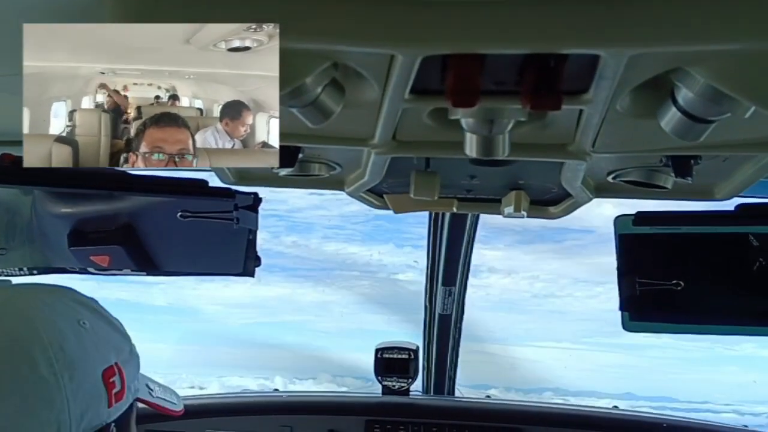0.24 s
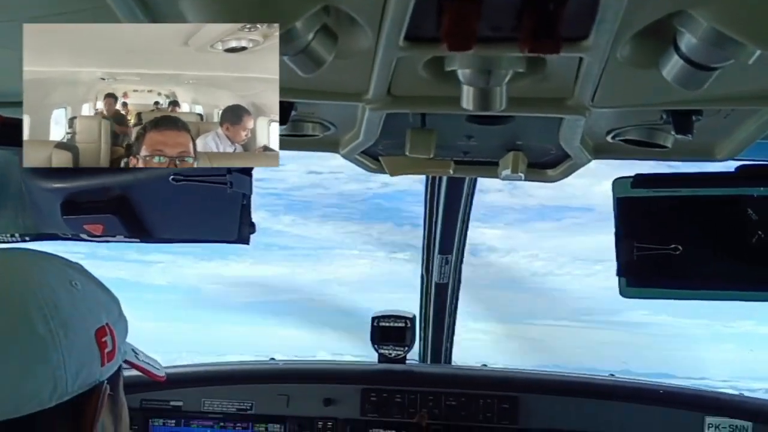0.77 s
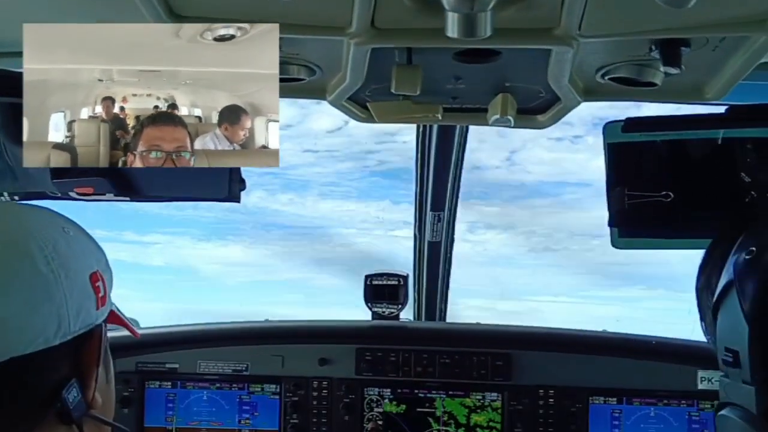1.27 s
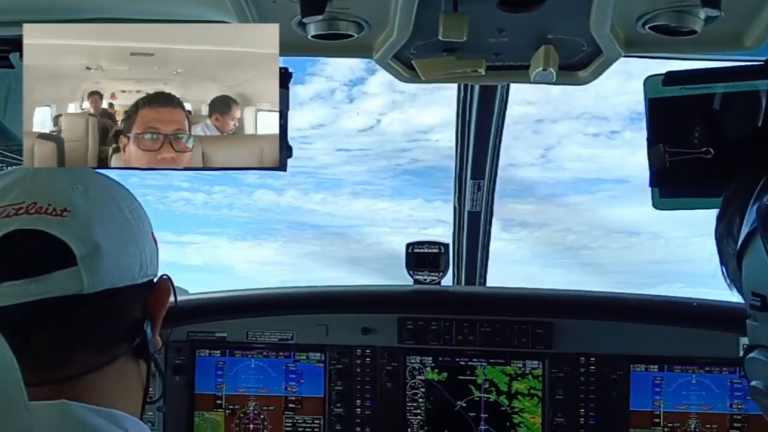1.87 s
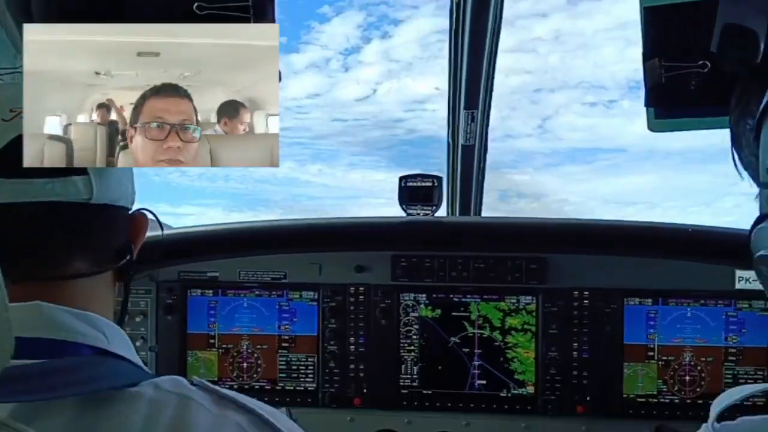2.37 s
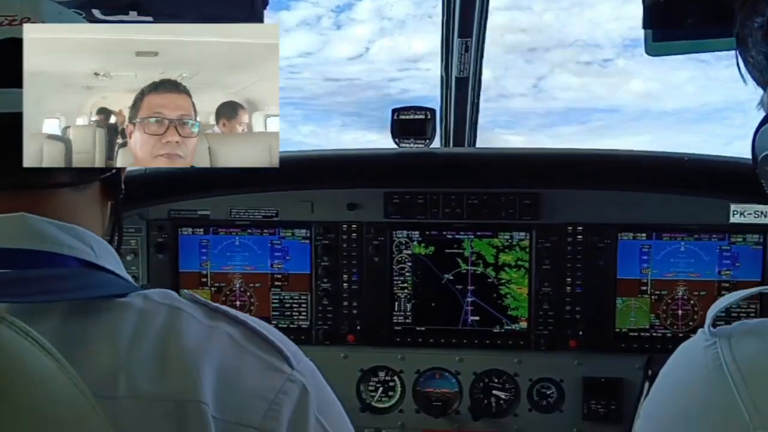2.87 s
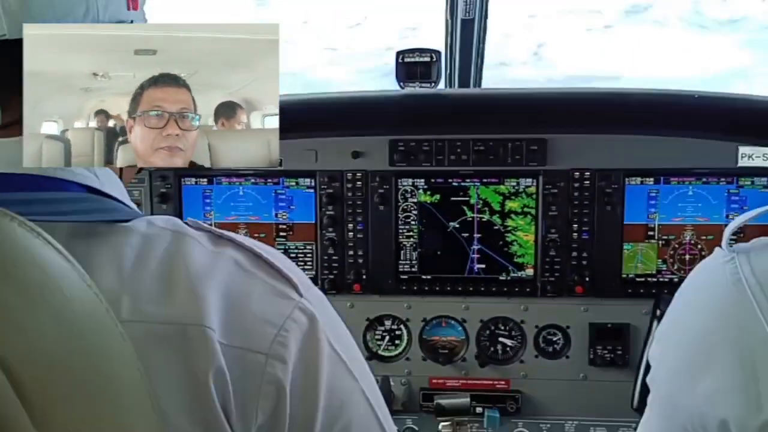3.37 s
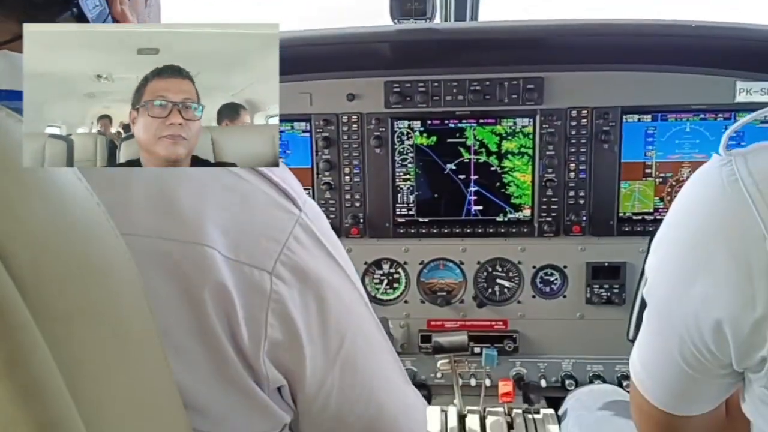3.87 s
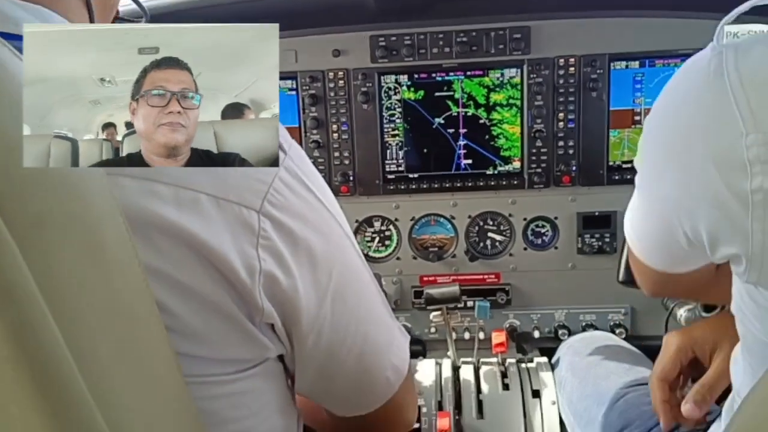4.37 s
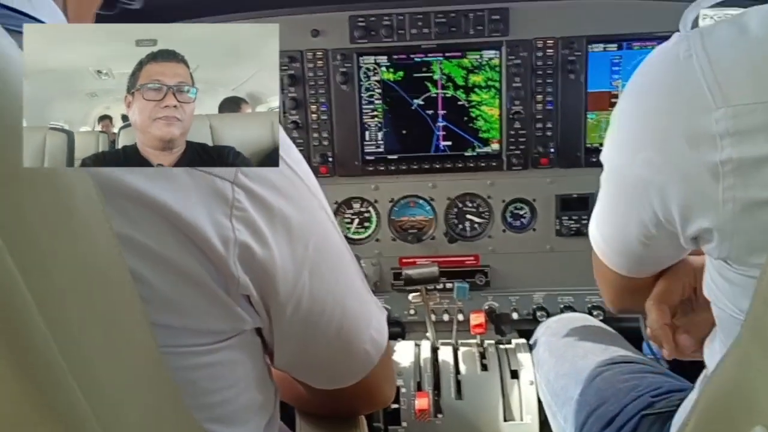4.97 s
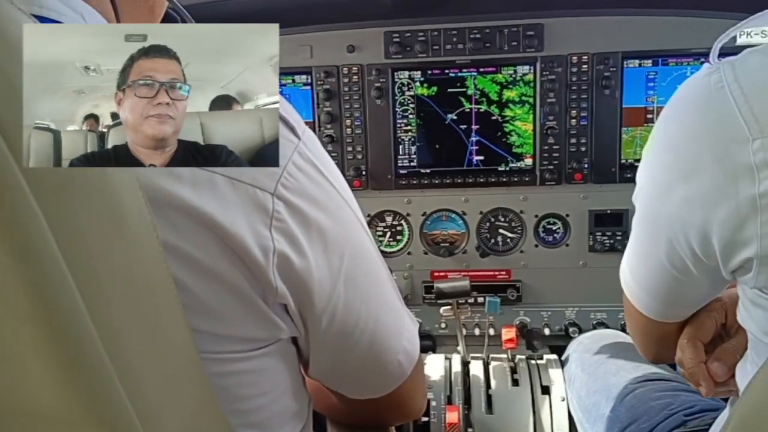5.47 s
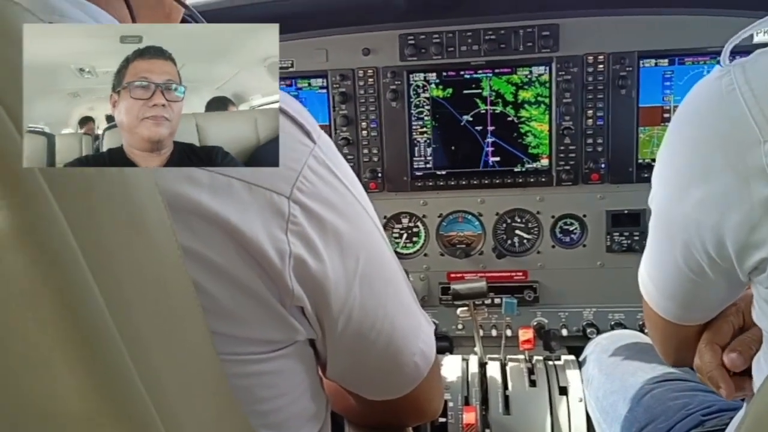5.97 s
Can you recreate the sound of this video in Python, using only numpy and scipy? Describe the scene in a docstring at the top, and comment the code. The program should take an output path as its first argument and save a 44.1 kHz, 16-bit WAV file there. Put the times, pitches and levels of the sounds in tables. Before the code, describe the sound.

Close, enclosed cockpit of a single turboprop in level cruise, caught by a handheld microphone behind the pilots. Deep, throbbing blade hum dominates, with faint steady machinery tones, muffled airflow rumble and midrange roar. Fine vent hiss, squeezed by automatic level control, trembles on each pulse. The tone colour changes subtly during a tilt downward, then a faint, very high whine rises and eases back.

```python
"""Inside the cabin of a single turboprop in level cruise, for about 6.2 s. From the start a four-blade propeller
drones as a harmonic series, faint machinery tones and narrow-band turbine whine join it, and filtered noise
gives the fuselage rush and the vent hiss. From 1.0 to 2.6 s the microphone tilts from the vents to the panel and
the balance shifts; then the lower whine swells, and the second blade harmonic dips near 3.15 s.
Throughout, a fast compressor ducks on the pressure crests, so that the hiss flutters with the drone."""
import sys
import numpy as np
from scipy.fft import rfft, irfft, next_fast_len
from scipy.io import wavfile
from scipy.ndimage import uniform_filter1d, map_coordinates

SR = 44100
rng = np.random.default_rng(int(sys.argv[2]) if len(sys.argv) > 2 else 0)


def dump(signal):
    """Clip the signal to [-1, 1] and save it as 16-bit WAV at the path in sys.argv[1]."""
    limited = np.clip(np.atleast_2d(signal).T, -1, 1)
    pcm = np.round(limited * 32767).astype(np.int16)
    wavfile.write(sys.argv[1], SR, pcm)


N = 274743

BLADE_HZ = 126.42  # mean blade-passing frequency
WHISTLE_HZ = 9799  # mean pitch of the turbine's whistle
TOP_HZ = 15500  # upper band limit of the whole sound


def amp(db):
    """Amplitude ratio of a level: 20 dB is a factor of ten."""
    return 10 ** (np.asarray(db) / 20)


def unit(x):
    """Normalisation to an rms value of 1."""
    return x / np.sqrt(np.mean(x ** 2) + 1e-20)


def wobble(rate):
    """Slow random modulation: a smooth spline through normal random knots, rate of them a second."""
    knots = rng.standard_normal(int(N * rate / SR) + 4)
    return map_coordinates(knots, [np.arange(N) * rate / SR])


def filtered(x, response):
    """Linear filtering: the spectrum of x is multiplied by a response of frequency."""
    m = next_fast_len(N + SR // 2)  # zero padding keeps the end from wrapping round
    hz = np.fft.rfftfreq(m, 1 / SR)
    return irfft(rfft(x, m) * response(hz), m)[:N]


def noise(response):
    """Coloured noise: white noise shaped by an amplitude response, rms 1."""
    return unit(filtered(rng.standard_normal(N), response))


def rush(points):
    """Broadband flow noise: a spectral density drawn through (f/Hz, level/dB) points on a log axis."""
    f, db = np.transpose(points)

    def response(hz):
        level_db = np.interp(np.log(hz + 1), np.log(f), db)
        return amp(level_db) / np.maximum(hz / f[-1], 1) ** 2  # a further 12 dB/octave fall above the last point

    return noise(response)


def tone(hz, drift_hz):
    """Frequency modulation: the phase of a sine of rms 1 integrates a slightly drifting pitch."""
    cycles = np.cumsum(hz + drift_hz * wobble(5)) / SR
    return np.sqrt(2) * np.sin(2 * np.pi * (cycles + rng.random()))


def propeller(standing_db, dispersion=0.98, scatter=0.034):
    """Harmonic series of blade pulses: panels disperse its phases, turbulence shakes high harmonics most."""
    # blade-passing harmonics 1, 2, 3, ..: rms level/dB
    harmonic_levels = [-19.5, -21.5, -30.5, -45.5, -51, -43.5, -48.5, -48, -56, -54.5, -58, -57]
    waver_first_db, waver_growth = 0.75, 0.7  # wavering of harmonic 1; its power law over the harmonic number
    waver_per_s = 6.5  # random knots a second
    angle = 2 * np.pi * np.cumsum(BLADE_HZ + 0.035 * wobble(2.06)) / SR
    drone = np.zeros(N)
    for k, db in enumerate(harmonic_levels, 1):
        waver_db = waver_first_db * k ** waver_growth
        lag = dispersion * k ** 2 + scatter * k * wobble(9)  # radians
        harmonic = amp(waver_db * wobble(waver_per_s)) * np.sin(k * angle - lag)
        drone -= amp(db + standing_db.get(k, 0)) * unit(harmonic)
    return drone


def machinery():
    """Structure-borne sound: the airframe carries faint tones of shaft, gears and accessories."""
    # nearly steady machinery tones: f/Hz, rms level/dB about which each one wavers
    tone_levels = [(26.3, -33), (158.1, -37.5), (853.2, -47.5), (884.9, -52), (1580, -65), (3002.5, -67.5)]
    return sum(amp(db + 2.9 * wobble(4.48)) * tone(hz, drift_hz=0.37) for hz, db in tone_levels)


def turbine(lower_db, upper_db, eddies, whistle_db=-63.0, flutter_db=1.15, flicker_db=1.55):
    """Narrow-band whine: noise in resonance-shaped bands, with one clean whistle in the lowest."""
    # whine bands: centre f/Hz, width/Hz between the -3.7 dB points, level/dB before flicker and flutter
    whine_bands = [(9840, 410, -55.5), (14630, 400, -48.4), (15000, 260, -60.9)]
    whistle_level_db = whistle_db + 1.4 * lower_db + 1.5 * wobble(14)  # swells more than its band
    sound = amp(whistle_level_db) * tone(WHISTLE_HZ, drift_hz=2.13)
    for (centre, width, db), shift_db in zip(whine_bands, (lower_db, upper_db, upper_db)):
        band = noise(lambda hz: (1 + (2 * (hz - centre) / width) ** 2) ** -.62)
        sound = sound + amp(db + shift_db + flicker_db * wobble(76)) * band
    return amp(flutter_db * eddies) * sound


def slipstream(eddies, rumble_db=-21.5, roar_db=-28.0, eddy_db=1.0, gust_db=.5):
    """Boundary-layer noise: an even rumble drummed on the skin, and a roar modulated by eddies and gusts."""
    # slipstream booming through the cabin walls: f/Hz, relative spectral density level/dB
    rumble_spectrum = [(20, -25), (41, -24), (54, -9), (68, -4), (108, -2), (150, 1), (180, -2), (205, 1.5),
                       (245, 2), (315, 1), (385, -8.5), (500, -11.5), (900, -30)]
    # slipstream roaring round the windscreen: f/Hz, relative spectral density level/dB
    roar_spectrum = [(200, -19), (390, -5.5), (455, 1), (620, -2.5), (790, -5.5), (930, -5.5),
                     (1300, -11.5), (1650, -13.5), (2200, -21), (3200, -32)]
    rumble = amp(rumble_db) * rush(rumble_spectrum)
    roar_level_db = roar_db + eddy_db * eddies + gust_db * wobble(14)
    return rumble + amp(roar_level_db) * rush(roar_spectrum)


def vents(aim_db, eddies, db=-42.6, flutter_db=0.8, sputter_db=1.5):
    """Jet noise: ram air hisses from the overhead nozzles, whose turbulence adds a fine sputter."""
    # vent air: f/Hz, relative spectral density level/dB
    hiss_spectrum = [(900, -19), (2400, -4), (3500, 1), (6500, 0.5), (6900, -4.5), (8000, -14), (9000, -16),
                     (11000, -12.5), (12600, -11), (13400, -11), (15500, -3)]
    level_db = db + aim_db + flutter_db * eddies + sputter_db * wobble(400)
    return amp(level_db) * rush(hiss_spectrum)


def ramp(start_s, length_s):
    """Linear transition: a steady move from 0 to 1."""
    return np.clip((np.arange(N) / SR - start_s) / length_s, 0, 1)


def scene():
    """Superposition of steady sources; aim, standing waves and one swell of the whine shift their balance."""
    # change over the whole tilt: first and second blade harmonic, vent hiss, upper whine
    first_tilt_db, second_tilt_db, vent_tilt_db, upper_tilt_db = 1.7, -1.2, -0.6, -0.6
    tilt = ramp(start_s=1.0, length_s=1.6) - .5  # -.5 towards the vents, +.5 towards the panel

    # the microphone crosses a node of the second harmonic's standing wave
    node_s, node_width_s, node_db = 3.15, 0.83, -1.5
    node = np.exp(-((np.arange(N) / SR - node_s) / node_width_s) ** 2)

    # the lower whine swells once while the microphone points at the panel
    swell_start_s, attack_s, hold_s, release_s, swell_db = 2.6, 0.62, 1.4, 0.3, 3.0
    swell = ramp(swell_start_s, attack_s) - ramp(swell_start_s + attack_s + hold_s, release_s)

    eddies = wobble(190)  # quick turbulence shared by roar, hiss and whine
    drone = propeller({1: first_tilt_db * tilt, 2: second_tilt_db * tilt + node_db * node})
    whine = turbine(swell_db * swell, upper_tilt_db * tilt, eddies)
    air = slipstream(eddies) + vents(vent_tilt_db * tilt, eddies)
    return (drone + machinery() + whine + air)[None]


def compressor(x, knee_db=-14.0, slope=0.56, ahead_s=0.00148, smooth_s=0.00064, makeup_db=0.4):
    """Look-ahead compression: gain falls with the power soon to come, so it dips just before a large crest."""
    power = np.abs(uniform_filter1d(x ** 2, max(int(smooth_s * SR), 1)))
    coming = np.interp(np.arange(N) + ahead_s * SR, np.arange(N), power)
    # far above the knee each dB of level costs 1.12 dB of gain
    gain = (1 + (coming / amp(knee_db) ** 2) ** 2) ** (-slope / 2)
    return x * amp(makeup_db) * gain


def leveller(x, window_s=0.0272, share=0.24):
    """Gain control: a share of each short-term departure from the mean power, in dB, is taken away."""
    power = np.abs(uniform_filter1d(x ** 2, max(int(window_s * SR), 1))) + 1e-9
    return x * (np.mean(power) / power) ** (share / 2)


def record(dry, low_cut_hz=56):
    """Dynamic-range control, then band limiting: the deep bass is thinned and nothing passes above TOP_HZ."""
    x = leveller(compressor(dry[0]))

    def band(hz):
        low_cut = hz ** 3 / np.hypot(hz ** 3, low_cut_hz ** 3)  # 18 dB/octave
        return (hz < TOP_HZ) * low_cut

    return filtered(x, band)[None]


dry = scene()
out = record(dry)
dump(out)
```